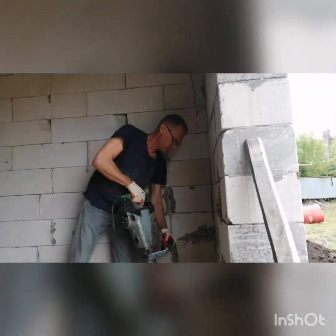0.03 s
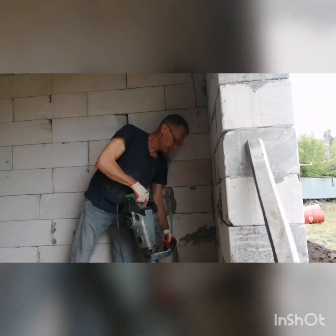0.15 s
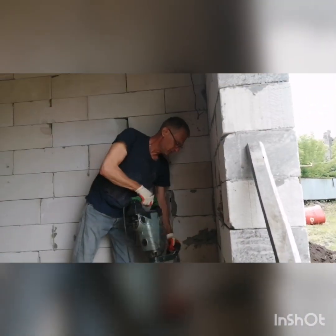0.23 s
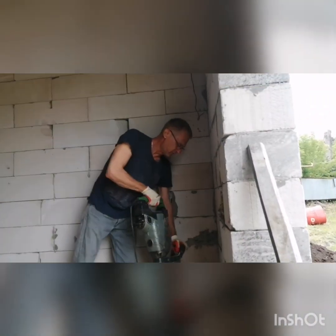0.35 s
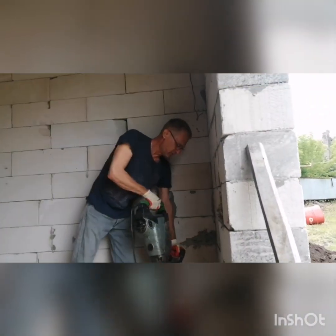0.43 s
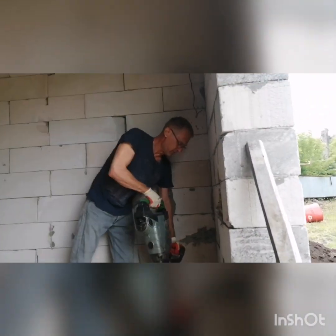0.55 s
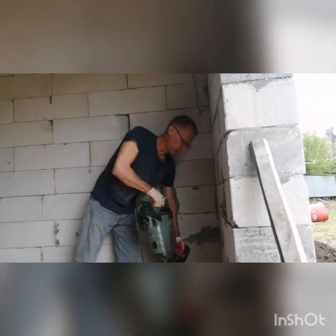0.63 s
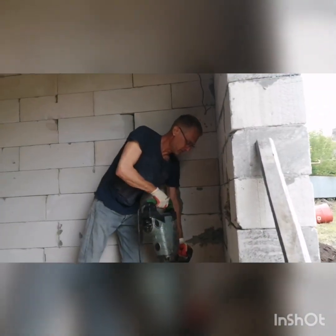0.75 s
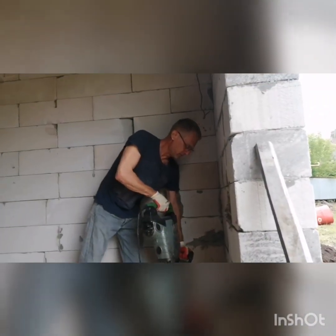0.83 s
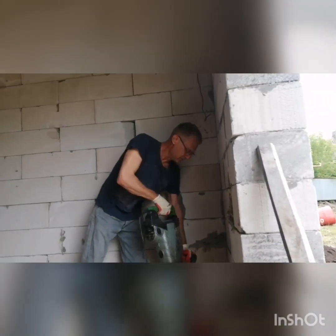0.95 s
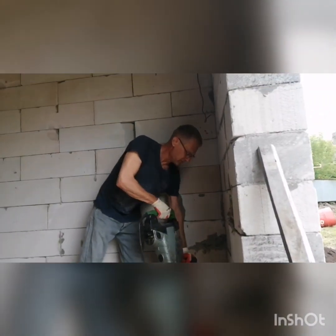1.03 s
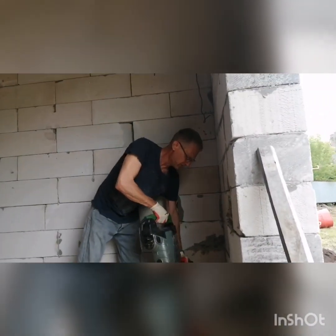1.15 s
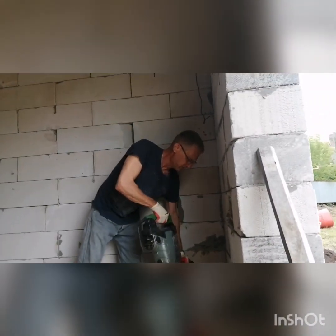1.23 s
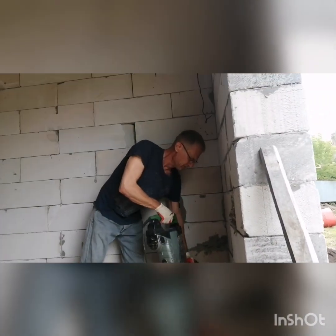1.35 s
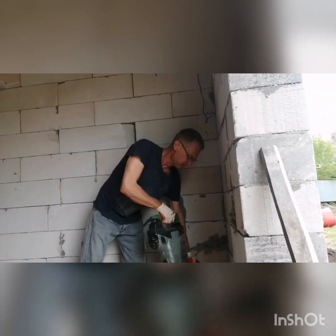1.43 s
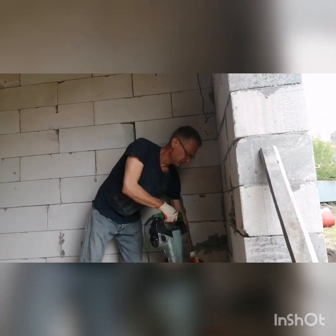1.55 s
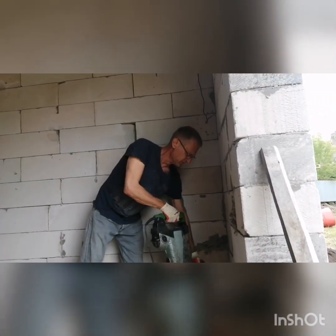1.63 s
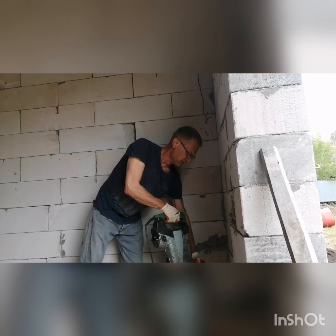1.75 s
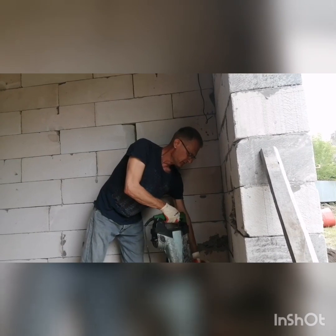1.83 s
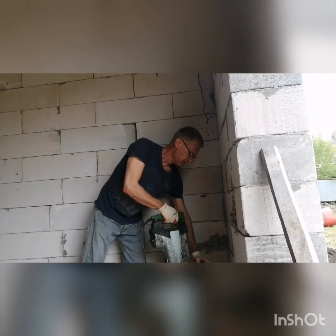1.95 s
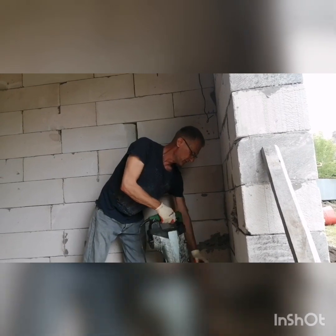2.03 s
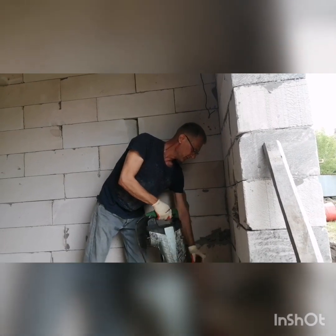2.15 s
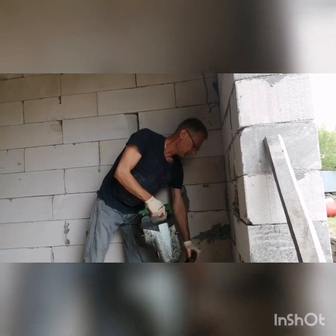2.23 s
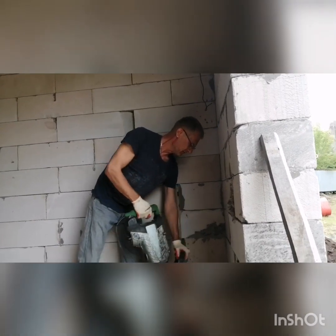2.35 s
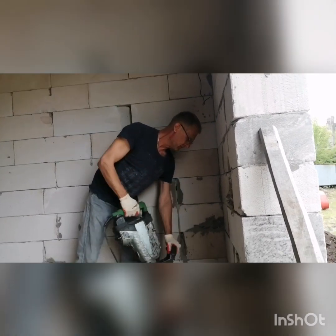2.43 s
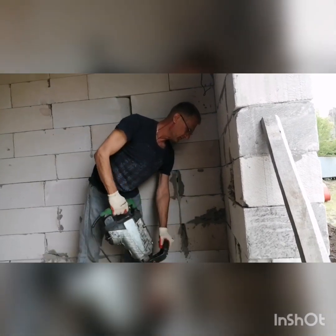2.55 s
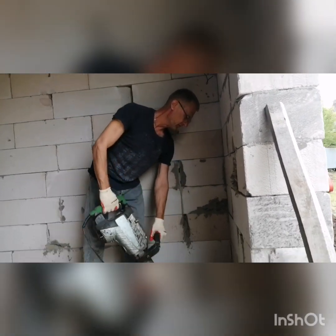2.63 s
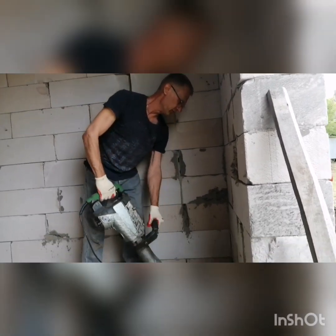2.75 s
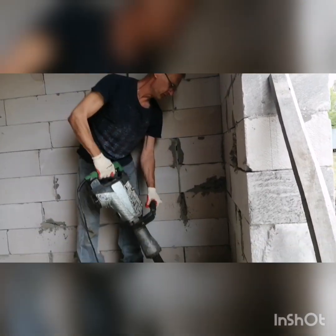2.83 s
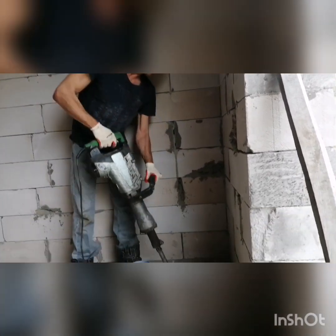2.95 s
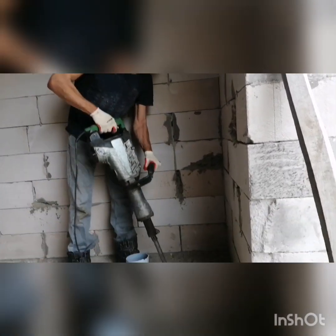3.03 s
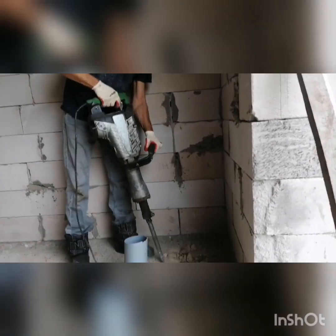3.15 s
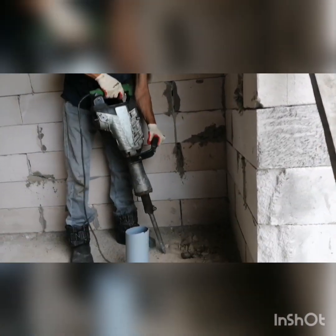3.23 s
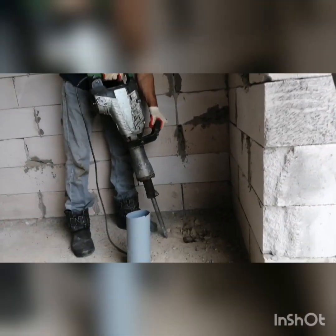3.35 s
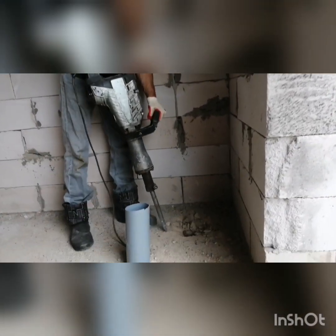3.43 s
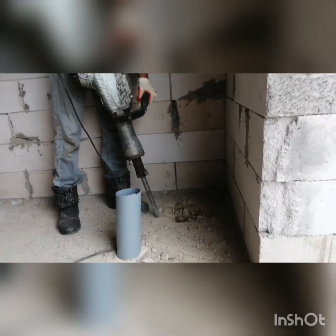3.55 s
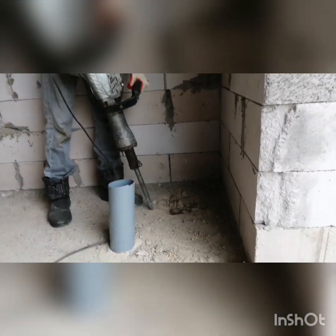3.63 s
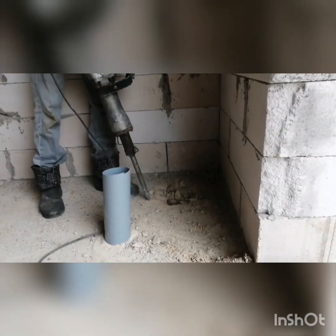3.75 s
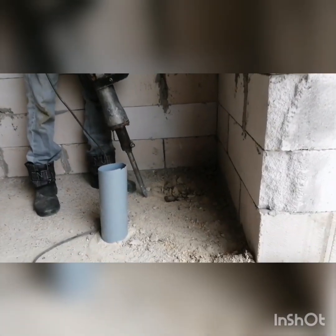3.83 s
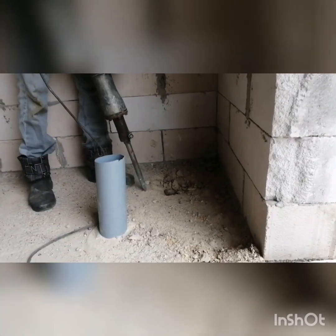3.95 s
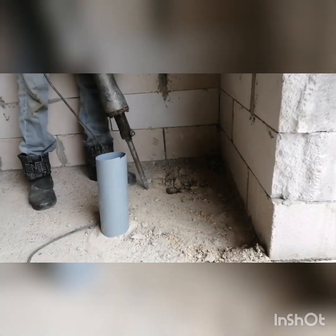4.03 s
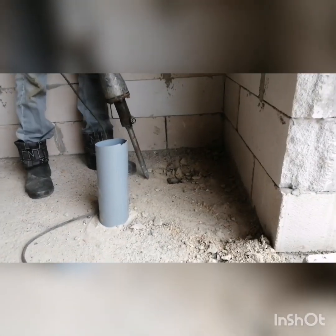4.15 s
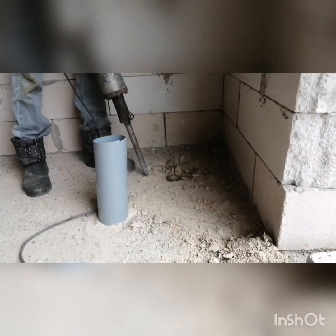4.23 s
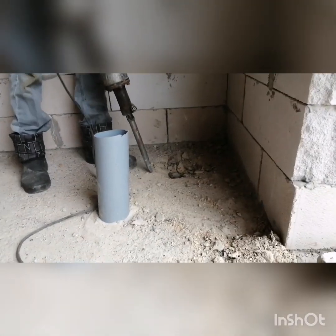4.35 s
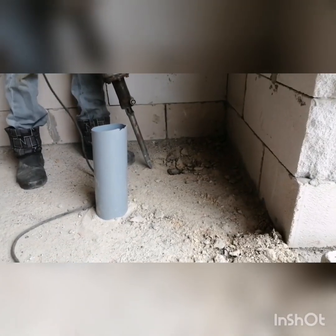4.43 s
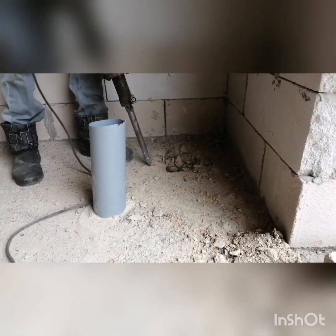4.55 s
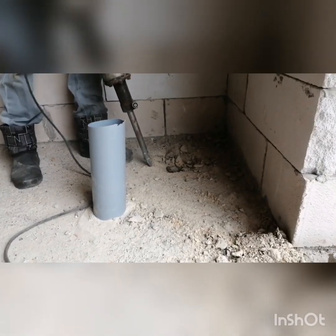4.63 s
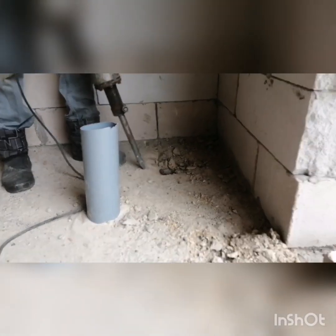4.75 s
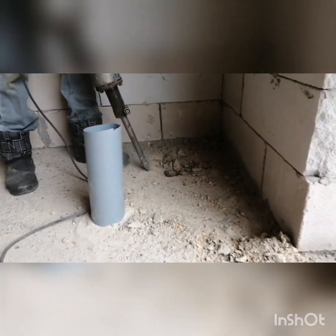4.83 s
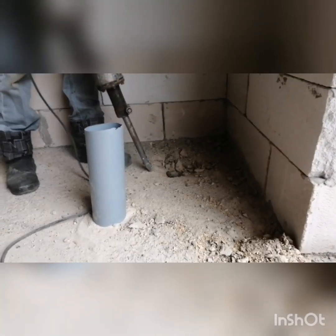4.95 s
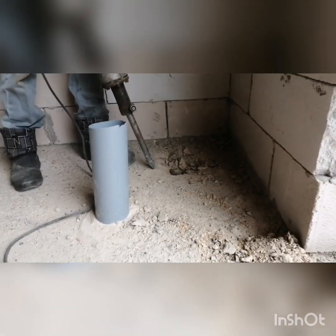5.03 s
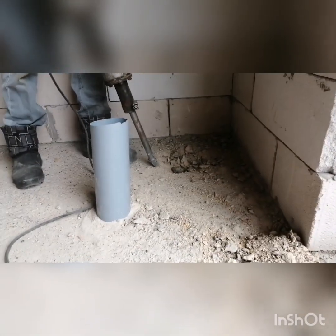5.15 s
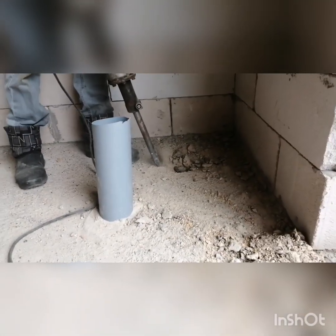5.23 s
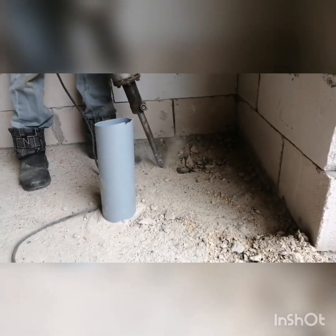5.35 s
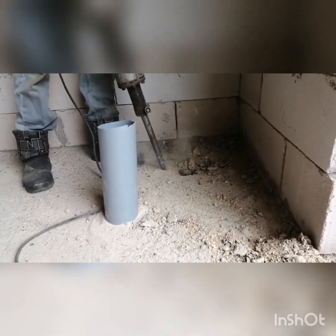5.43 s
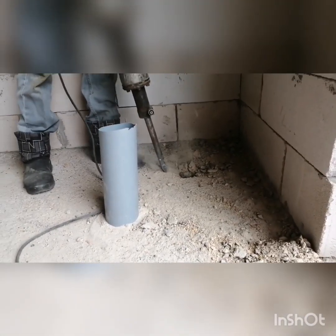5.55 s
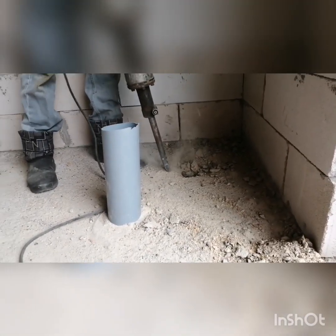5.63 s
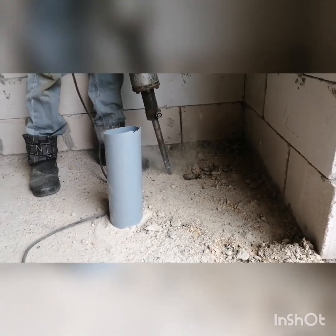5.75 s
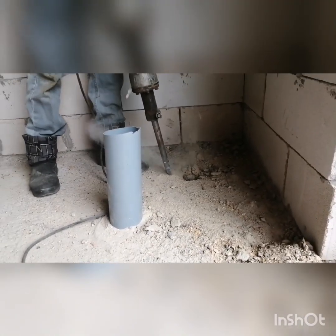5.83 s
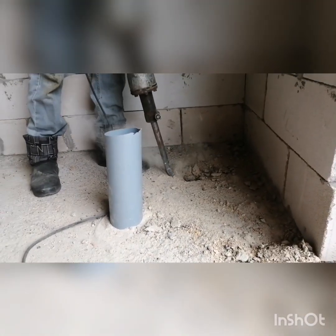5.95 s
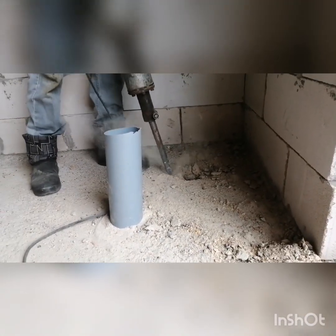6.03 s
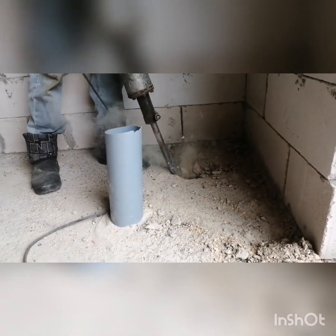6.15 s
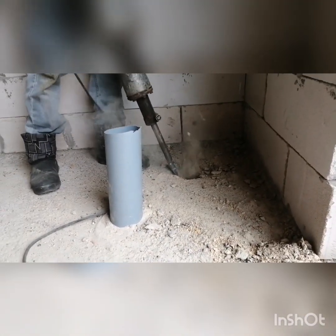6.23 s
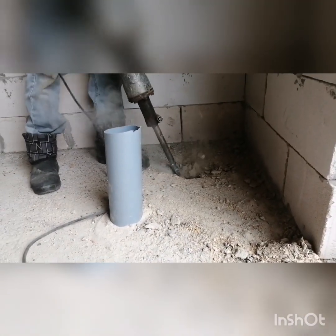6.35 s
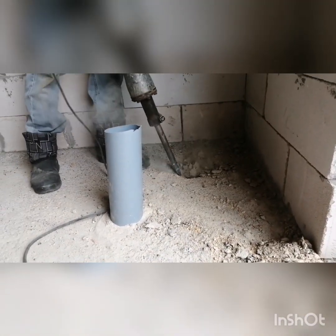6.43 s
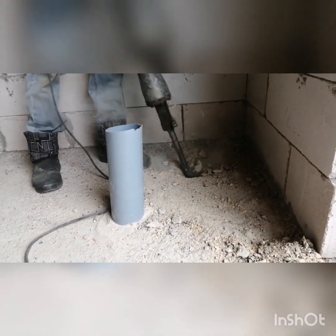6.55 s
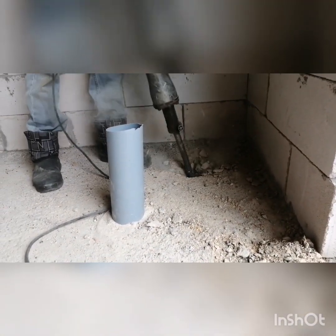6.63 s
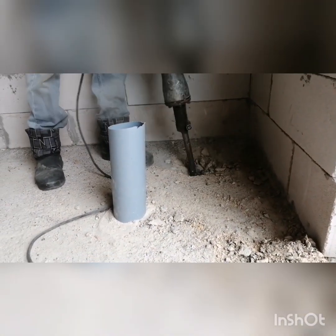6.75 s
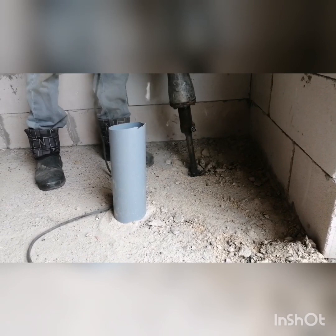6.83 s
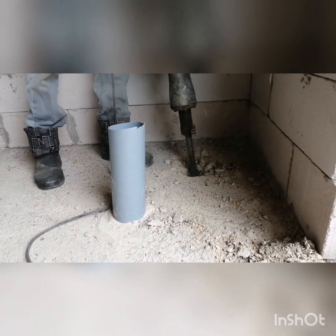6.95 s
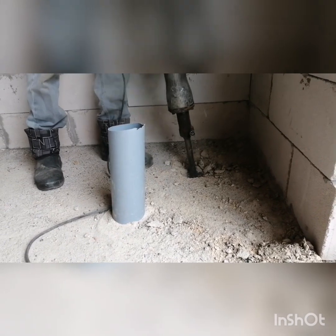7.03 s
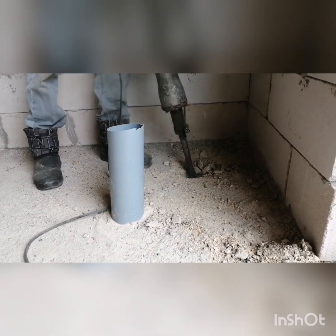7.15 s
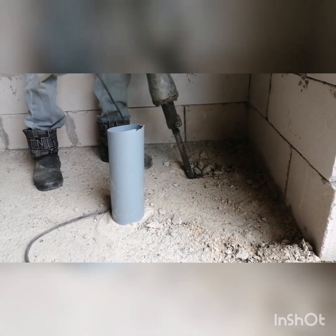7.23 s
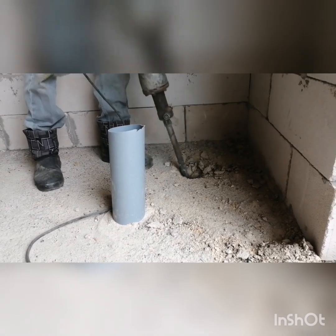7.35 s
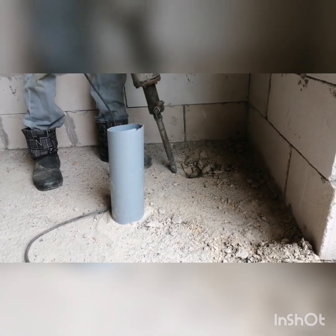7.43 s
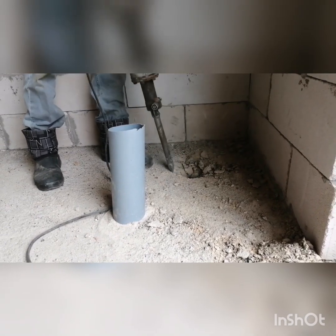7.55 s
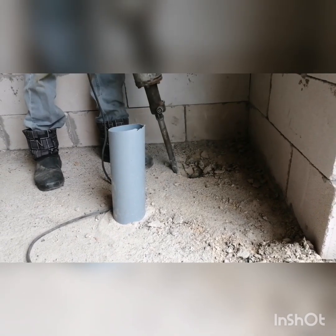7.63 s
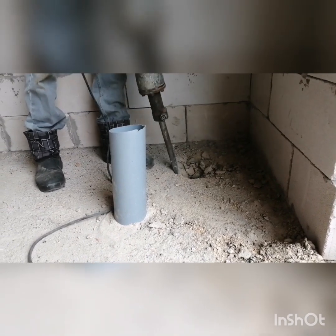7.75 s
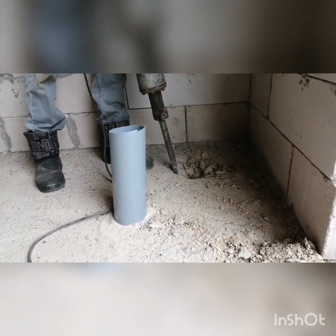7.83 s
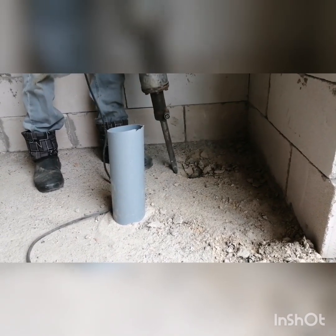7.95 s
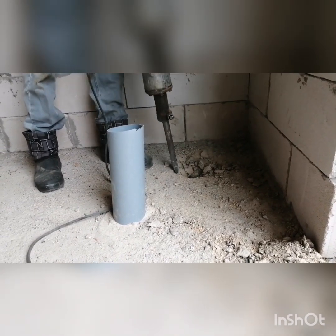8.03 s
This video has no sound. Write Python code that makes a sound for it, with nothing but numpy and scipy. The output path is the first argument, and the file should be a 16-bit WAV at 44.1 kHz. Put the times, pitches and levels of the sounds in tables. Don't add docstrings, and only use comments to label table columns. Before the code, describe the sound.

Geared motor noise and a brief squeak lead into a dry, rattling run of steel blows on concrete, slowing unevenly until it stops. A quieter pause holds ringing chisel clinks, dull bumps and small stones turning. Then the breaker restarts harder, with low floor rumble and gritty noise, before the slab gives way and the strokes slow. Soft boot thuds and metal clanks end it. Hard walls give short, diffuse reverberation; the microphone is near and buffeted.

```python
import sys
import numpy as np
from scipy import signal
from scipy.fft import rfft, irfft, next_fast_len
from scipy.io import wavfile

SR = 44100
rng = np.random.default_rng(int(sys.argv[2]) if len(sys.argv) > 2 else 0)


def boost(x):
    u = np.asarray(x, float) / 20
    return 10 ** u


def unload_wav(signal):
    wavfile.write(
        sys.argv[1],
        SR,
        np.round(np.clip(np.atleast_2d(signal).T, -1, 1) * 32767).astype(np.int16),
    )


N = 356769

# (frequency [Hz], level [dB], t60 [s])
CHISEL_MODES = [(6675, -3.5, 0.13), (6790, -8, 0.08), (6720, -10, 0.1), (6875, -8, 0.093), (6960, -14, .05),
                (9610, -11, .08), (12020, -27.5, 0.12), (12950, -18, .04), (14150, -22, .06)]
# (frequency [Hz], level [dB], t60 [s])
BENDING_MODES = [(2330, -6, .05), (2480, -8, .05), (4330, -3, .04), (4480, -1, .06), (4620, -6, .04)]
# (frequency [Hz], density [dB per Hz])
DULL_CRACK = [(300, -11), (1500, -6), (3000, 0.5), (7000, 3), (9500, -6.5), (12000, -16), (16000, -18)]
# (time [s], blow force [dB], seating in the slab [dB])
BITE_FIRST = [
    (0.499, -30.5, -37),
    (.68, -20.5, -22.5),
    (.87, -24, -20),
    (1.001, -28, -28),
    (1.12, -26.5, -48.5),
    (1.4, -27.5, -36),
    (1.65, -30, -37),
    (2.1, -28, -44.5),
    (2.62, -29, -50.5),
]
# (time [s], blow force [dB], seating in the slab [dB])
BITE_SECOND = [
    (5.12, -25, -31),
    (5.36, -16, -25.5),
    (5.6, -20.5, -28),
    (5.9, -15.5, -16.5),
    (6.12, -25, -27),
    (6.18, -21.5, -30),
    (6.5, -22.5, -24),
    (6.63, -19, -51),
    (7.16, -21, -54),
]
# (time [s], rumble [dB], casing drone [dB])
SHIFTS = [
    (.488, -40, -61),
    (3.19, -49, -58),
    (3.32, -41.5, -60),
    (4.29, -50, -76),
    (4.35, -52.5, -62),
    (4.68, -48.5, -48.5),
    (4.8, -57, -88),
    (5.08, -48, -74),
    (7.66, -60, -49.5),
    (7.75, -53, -57),
]


def in_time(rows):
    s, *columns = np.transpose(rows)
    return [np.interp(np.arange(N) / SR, s, c) for c in columns]


def at_hz(points, hz):
    log_hz, values = np.log(np.array(points)[:, 0]), np.array(points)[:, 1]
    return np.interp(np.log(hz + 1), log_hz, values)


def rms_one(x):
    return x / np.sqrt(np.mean(x ** 2) + 1e-20)


def colour(x, spectrum, share=1):
    size = next_fast_len(x.shape[-1])
    gain = boost(share * at_hz(spectrum, np.fft.rfftfreq(size, 1 / SR)))
    return irfft(rfft(x, size) * gain, size)[..., :x.shape[-1]]


def clicks(times, db):
    out = np.full(N, 1e-18)
    index = np.minimum((times * SR).astype(int), N - 1)
    np.add.at(out, index, boost(db))
    return out


def dying(x, t60):
    return signal.lfilter([1], [1, -boost(-60 / (t60 * SR))], x)


def ring(x, hz, t60):
    r, w = boost(-60 / (t60 * SR)), 2 * np.pi * hz / SR
    return signal.lfilter([0, np.sin(w)], [1, -2 * r * np.cos(w), r * r], x)


def grains(spread_db, share):
    share = np.clip(share, 0, 1)
    size_db = spread_db * np.minimum(rng.exponential(1, N), 4)
    own = rng.standard_normal((3, N)) * boost(size_db)
    return share * own[0] + own[1:] * np.sqrt(1 - share ** 2)


def flicker(rate):
    steps = rng.standard_normal(400)
    return np.interp(np.arange(N) / SR * rate, np.arange(len(steps)), steps)


def strokes():
    # (time [s], crack [dB], thump [dB], ring [dB], bending ping [dB])
    first_burst = [(0.5134, -18, -38.5, -22, -31.5), (0.5632, -18, -34.5, -32, -39.5),
                   (0.6091, -18, -31.5, -25.5, -35.5), (0.6594, -17, -28, -28.5, -36.5),
                   (0.7062, -16.5, -33, -30, -36.5), (0.7545, -15, -31, -24.5, -37.5),
                   (0.8003, -15.5, -28.5, -35, -27.5), (0.8473, -20.5, -29.5, -28.5, -37.5),
                   (0.8973, -20, -31.5, -32.5, -45), (0.9476, -23, -33.5, -23, -46.5),
                   (0.9966, -23, -32, -27.5, -40), (1.0437, -20, -33.5, -28.5, -39),
                   (1.092, -21, -39, -29.5, -43), (1.1402, -17, -52, -31, -42),
                   (1.1812, -20.5, -43, -33, -34.5), (1.2258, -21, -41, -32, -37),
                   (1.271, -16.5, -44, -33.5, -33), (1.317, -21, -48.5, -33, -58),
                   (1.3669, -21, -40, -32.5, -46), (1.4167, -17.5, -38.5, -35, -38),
                   (1.4655, -23.5, -41, -28, -36), (1.513, -19, -45.5, -35.5, -31),
                   (1.5572, -21.5, -44.5, -28.5, -40), (1.6058, -18.5, -49, -33, -34),
                   (1.662, -23, -47.5, -28.5, -44), (1.7043, -17.5, -41, -32, -40),
                   (1.7587, -18.5, -43, -28.5, -32), (1.8065, -19, -47.5, -28, -42),
                   (1.8547, -22, -42, -28.5, -38), (1.8986, -20, -48, -28.5, -44),
                   (1.948, -20.5, -48.5, -30, -33), (2.0071, -24, -46, -27, -43),
                   (2.0774, -25.5, -59, -29.5, -32), (2.1451, -23.5, -52, -30, -46),
                   (2.2284, -21.5, -43.5, -32.5, -56), (2.3262, -22.5, -41.5, -36, -42),
                   (2.4506, -22, -38.5, -34, -26), (2.6151, -23, -49, -37.5, -35)]
    # (time [s], crack [dB], thump [dB], ring [dB], bending ping [dB])
    second_burst = [(5.1259, -19, -28, -30, -32), (5.1965, -14, -26.5, -30, -42),
                    (5.257, -17, -26, -26, -38), (5.3104, -14.5, -27.5, -33, -31),
                    (5.3641, -14, -29.5, -28.5, -36), (5.4137, -15.5, -26.5, -36, -40),
                    (5.462, -15, -25, -31.5, -38), (5.5088, -15, -24.5, -34, -43),
                    (5.5559, -15.5, -27, -32, -40), (5.6045, -16, -24, -37, -42),
                    (5.6504, -17, -23.5, -36, -39), (5.6974, -15.5, -27.5, -34.5, -36),
                    (5.7455, -14, -24.5, -37, -28), (5.7917, -15.5, -23.5, -31.5, -36),
                    (5.8365, -16, -23.5, -32, -41), (5.883, -14.5, -25, -28.5, -29),
                    (5.9303, -15.5, -24.5, -32, -30), (5.977, -15, -24, -29, -31),
                    (6.0242, -13, -23.5, -29, -40), (6.0727, -17.5, -23.5, -37, -49),
                    (6.119, -16.5, -24, -34, -43), (6.1679, -16.5, -31, -31.5, -38),
                    (6.2153, -16.5, -33, -37.5, -28.5), (6.26, -14.5, -31, -39, -45),
                    (6.3052, -14, -28.5, -33, -30), (6.351, -17, -29.5, -30.5, -47),
                    (6.3938, -16.5, -29.5, -33, -46), (6.4387, -15.5, -30, -35, -41),
                    (6.4835, -16, -28, -31.5, -41), (6.5259, -12, -30.5, -33, -41),
                    (6.5721, -14, -36, -27, -40), (6.619, -19, -51, -31.5, -37),
                    (6.6584, -20, -38, -35, -44), (6.7021, -17.5, -45, -27.5, -44),
                    (6.7461, -17.5, -38.5, -36, -43), (6.79, -17, -41, -37, -39),
                    (6.8314, -16.5, -47, -29, -42), (6.8794, -15.5, -38.5, -26, -32),
                    (6.9336, -19, -42.5, -36, -34), (6.9935, -18, -36, -28, -29),
                    (7.0646, -19.5, -42, -26, -36.5), (7.1536, -17.5, -39.5, -23, -31)]
    return np.transpose(first_burst + second_burst)


def thump(s, db):
    t = np.arange(-60, 61) / SR / 0.00025
    pulse = (t * t - 1) * np.exp(-t * t / 2)
    push = np.convolve(clicks(s, db), pulse, "same")
    boom = boost(-25.5) * ring(push, hz=408, t60=0.0047) + boost(-36.5) * ring(push, hz=1160, t60=0.0066)
    return boost(6.5) * (push + boom)


def crack(s, db, spectrum, rise):
    late_s = rng.uniform(0.013, 0.026, len(s))
    hit = dying(clicks(s, db), t60=0.027) + dying(clicks(s + late_s, db - 9.5), t60=0.0063)
    swell = signal.lfilter([rise], [1, rise - 1], hit)
    return boost(5.0) * swell * rms_one(colour(grains(2.2, 0.19), spectrum))


def chisel(s, db, modes, rattle_s, trim_db, damping):
    scatter_db = 2.5
    out, noise = np.zeros((2, N)), rng.standard_normal((3, N))
    shake = 0.36 * noise[0] + noise[1:]
    for k, (hz, mode_db, t60) in enumerate(modes):
        struck = clicks(s, db + mode_db + trim_db + scatter_db * rng.standard_normal(len(s)))
        rattle = dying(struck, rattle_s) + 2.46 * dying(struck, t60=0.02)
        fresh_shake = np.roll(shake, 5000 * k, axis=1)
        out += ring(rattle * fresh_shake, hz, t60 / damping)
    return out


def blows():
    # (frequency [Hz], density [dB per Hz])
    sharp_crack = [(300, -9.5), (1500, -7.5), (2600, -5), (3830, -1), (4500, 2), (7000, 0.5), (9000, -4.5),
                   (11000, -4), (13500, 1.5), (15000, -4), (16300, -27.5)]
    # (frequency [Hz], level [dB], t60 [s])
    barrel_modes = [(2150, -3, .012), (2400, -1, .012), (2650, -2, .012), (2900, 0, .012), (3200, -5, .01),
                    (4400, -11, .02)]
    # (time [s], crack [dB], thump [dB], ring [dB], clank [dB])
    extra_contacts = [
        (.489, -29.5, -33, -42, -20),
        (4.6803, -34, -32, -45, -36),
        (.5135, -40, -50, -23, -20),
    ]
    drive_db = [-6, 9, 5, 17]
    drive_slope = [1, 1.179, 0.97, 1.31]
    clank_above_db = [3.5, -7]

    s, *levels = strokes()
    crack_db, thump_db, ring_db, ping_db = [d + k * db for d, k, db in zip(drive_db, drive_slope, levels)]
    burst = (s > 5).astype(int)
    uneven_db = 2.0 * rng.standard_normal(len(s))
    clank_db = thump_db + np.array(clank_above_db)[burst] + uneven_db
    ping = chisel(s, ping_db, BENDING_MODES[2:], rattle_s=.025, trim_db=-30, damping=2)

    beat = np.c_[s, crack_db, thump_db, ring_db, clank_db]
    s, crack_db, thump_db, ring_db, clank_db = np.transpose(np.r_[extra_contacts, beat])
    steel = chisel(s, ring_db, CHISEL_MODES, rattle_s=0.14, trim_db=-27.5, damping=2)
    barrel = chisel(s, clank_db, barrel_modes, rattle_s=.025, trim_db=-27, damping=1)

    gap_s = np.diff(s, prepend=s[0])
    slow = (gap_s > .11) & (gap_s < 1)
    snap = crack(s[~slow], crack_db[~slow], sharp_crack, rise=0.013)
    snap = snap + crack(s[slow], crack_db[slow], DULL_CRACK, rise=0.005)
    return thump(s, thump_db) + snap + steel + barrel + ping


def knocks():
    # (time [s], crack [dB], ring [dB], bending [dB])
    rattles = [(2.793, -76, -40, -49), (2.847, -34.5, -18.5, -35), (3.235, -72, -25, -43),
               (3.871, -71.5, -61, -53), (4.3517, -74, -53, -40.5), (4.439, -72, -60, -51),
               (4.5438, -45.5, -33.5, -48.5), (4.5574, -48, -56, -58), (7.795, -27, -16.5, -52),
               (7.8135, -38, -31, -42), (8.0811, -62, -46, -60)]
    # (time [s], crack [dB], slab thump [dB], ring [dB])
    bumps = [(3.2074, -40.5, -44.5, -57), (3.2696, -59, -42.5, -27.5), (3.3205, -44, -36, -24.5),
             (3.6085, -50, -56, -64), (3.6499, -41.5, -50.5, -62.5), (3.7286, -43.5, -57, -71),
             (3.9602, -56, -58.5, -67.5), (4.3523, -56, -44.5, -69), (4.3999, -48, -44.5, -53),
             (4.44, -53, -51.5, -51), (4.68, -30, -30, -38), (4.7, -55, -48, -64), (4.808, -67, -47, -71),
             (4.896, -57, -51.5, -98), (5.0475, -34, -53, -39), (7.6787, -43, -55, -19.5),
             (7.706, -33, -40.5, -19.5), (7.754, -32, -41, -51), (8.0646, -29, -34, -20.5),
             (8.0811, -35, -36, -64)]
    # (frequency [Hz], level [dB], t60 [s])
    slab_modes = [(181, -5.5, 0.32), (235, -3, 0.25), (294, -24, 0.12), (495, 5, 0.042), (714, 4.5, 0.013),
                  (1090, 8.5, 0.028)]
    thump_below_db, bend_below_db = -42, -14.5
    loose = [(s, snap, tone + thump_below_db, tone, bend) for s, snap, tone, bend in rattles]
    down = [(s, snap, thud, tone, tone + bend_below_db) for s, snap, thud, tone in bumps]
    s, crack_db, thump_db, ring_db, bend_db = np.transpose(loose + down)
    free = [(hz, db - (k > 4), t60) for k, (hz, db, t60) in enumerate(CHISEL_MODES)]
    steel = chisel(s, ring_db, free, rattle_s=0.066, trim_db=-32, damping=1.17)
    bending = chisel(s, bend_db, BENDING_MODES, rattle_s=.05, trim_db=-29, damping=1)
    boom = chisel(s, thump_db, slab_modes, rattle_s=0.07, trim_db=-37.5, damping=1.2).mean(axis=0)
    contact = boost(-1.5) * thump(s, thump_db) + crack(s, crack_db - 3.0, DULL_CRACK, rise=0.06)
    return contact + steel + bending + boom


def room(x):
    # (frequency [Hz], t60 [s])
    decay_times = [(100, 0.55), (400, 0.52), (1500, 0.14), (5000, 0.39), (15000, 0.26)]
    # (frequency [Hz], common share)
    walls_alike = [(100, 1), (250, .75), (500, .9), (1500, 0.63), (4000, 0.54)]
    size, tail = SR // 2, 0
    t = np.arange(size) / SR
    for low in 50 * 2. ** np.arange(8):
        high = min(2 * low, 19000) if low < 6000 else 19000
        band = signal.butter(2, [low, high], "band", fs=SR, output="sos")
        alike = np.clip(at_hz(walls_alike, 2.3 * low), 0, 1)
        noise = rng.standard_normal((3, size))
        noise = alike * noise[0] + np.sqrt(1 - alike ** 2) * noise[1:]
        tail = tail + signal.sosfilt(band, noise) * boost(-60 * t / at_hz(decay_times, 1.83 * low))
    tail *= np.clip(t / 0.0017, 0, 1)
    tail /= np.sqrt(np.sum(tail ** 2, axis=1, keepdims=True))
    return boost(-4) * signal.fftconvolve(x, tail, axes=1)[:, :N]


def shifts(db):
    keep = np.exp(-1 / (0.005 * SR))
    return signal.lfilter([1 - keep], [1, -keep], dying(clicks(np.transpose(SHIFTS)[0], db), t60=0.83))


def steady():
    # (time [s], whirr [dB])
    motor_levels = [(0.0, -44), (.3, -42.5), (.47, -37.5), (.52, -36), (1.6, -41.5), (2.49, -46),
                    (2.85, -55), (3.17, -55.5), (3.83, -84), (5.045, -72.5), (5.07, -36), (5.12, -29.5),
                    (5.15, -41), (6.85, -40), (7.19, -52), (7.28, -47), (7.63, -40), (7.72, -48)]
    # (middle time [s], level [dB], half length [s])
    sweeps = [
        (0.068, -47.5, 0.11),
        (0.457, -38.5, 0.16),
        (3.335, -53, 0.1),
        (3.663, -55.5, 0.098),
        (4.433, -63, 0.16),
        (7.363, -53, 0.71),
    ]
    still_db = [-71, -77.5, -92.5]
    slab_carries_db = [-28.5, -35]
    t = np.arange(N) / SR
    motor_db, = in_time(motor_levels)
    stopping_db = 11 * np.clip(t - motor_levels[-1][0], 0, None)
    motor = boost(motor_db - stopping_db)
    _, boom_db, hum_db = np.transpose(SHIFTS)
    drone = boost(still_db[0]) + boost(6) * motor ** 1.38 + shifts(hum_db)
    rumble = boost(still_db[1]) + boost(-33.5) * motor
    for bite, carry_db in zip((BITE_FIRST, BITE_SECOND), slab_carries_db):
        seat_db = in_time(bite)[1]
        starts = np.clip((t - bite[0][0]) / 0.024, 0, 1)
        fades = np.clip(1 - (t - bite[-1][0]) / 0.22, 0, 1)
        drone = drone + starts * fades * boost(-19 + seat_db)
        rumble = rumble + starts * fades * boost(carry_db + 0.45 * seat_db)
    swept = sum(boost(db) * np.clip(1 - abs(t - s) / half, 0, 1) ** 2 for s, db, half in sweeps)
    grit = boost(still_db[2]) + boost(-10) * motor + swept
    return motor + shifts(hum_db - 20), drone, rumble, grit, shifts(boom_db)


def gears(db, modes, share, patchy_db):
    teeth, out = grains(1.5, share), 0
    for k, (hz, width, peak_db) in enumerate(modes):
        r = np.exp(-np.pi * width / SR)
        a = [1, -2 * r * np.cos(2 * np.pi * hz / SR), r * r]
        gain = boost(peak_db + patchy_db * flicker(25))
        out = out + (-1) ** k * gain * signal.lfilter([1 - r * r, 0, r * r - 1], a, teeth)
    return boost(db) * rms_one(out)


def coasting():
    # (time [s], frequency [Hz], level [dB])
    run_down = [
        (7.2, 680, -75),
        (7.27, 655, -60),
        (7.4, 598, -57),
        (7.53, 545, -52.5),
        (7.65, 495, -60),
        (7.69, 485, -69),
    ]
    # (multiple of the rotation, level [dB])
    orders = [(1, 0.5), (1.5, -4), (2, -2), (3, -11), (4, -4)]
    t = np.arange(N) / SR
    hz, db = in_time(run_down)
    turns = np.cumsum(hz * (1 + .012 * flicker(60))) / SR
    tones = sum(boost(order_db + 6.5 * flicker(45)) * np.sin(2 * np.pi * k * turns) for k, order_db in orders)
    return boost(db) * tones * (t > run_down[0][0]) * (t < run_down[-1][0])


def motor_noise(whirr, drone):
    # (frequency [Hz], width [Hz], level [dB])
    housing = [(1944, 250, -3), (2275, 100, 5.5), (2537, 100, 2.5), (3140, 710, -4.5), (5300, 430, 2.5)]
    # (frequency [Hz], width [Hz], level [dB])
    casing = [(540, 250, -2.5), (1017, 58, -2), (1120, 110, -0.5), (1300, 330, -10)]
    throbs = [0.022, 0.195, 0.364, 7.215, 7.326, 7.446, 7.586]
    load = .6 + dying(clicks(np.array(throbs), -1.5), t60=.55)
    motor = whirr * gears(0.61, housing, 0.58, patchy_db=4.5)
    motor = motor + drone * gears(0.0, casing, 0.88, patchy_db=3.5)
    return load * (motor + coasting())


def squeaks():
    # (time [s], frequency [Hz], level [dB], length [s])
    tooth_songs = [(0.051, 1340, -43.5, 0.16), (0.07, 892, -48.5, 0.14), (0.246, 1120, -48.5, 0.12),
                   (0.427, 1136, -44, 0.15), (0.456, 2320, -31.5, 0.055), (5.097, 597, -42, 0.089),
                   (7.35, 1242, -50, 0.049), (7.61, 1575, -47, .05), (7.474, 1120, -47, 0.057),
                   (7.484, 2260, -43, 0.069), (7.612, 1108, -41, 0.038), (7.634, 2330, -50, 0.049)]
    t, out = np.arange(N) / SR, 0
    for s, hz, db, length in tooth_songs:
        swell = np.clip(1 - (2 * (t - s) / length) ** 2, 0, 1)
        out = out + boost(db) * swell * rms_one(ring(rng.standard_normal(N), hz, t60=0.08))
    return out


def floor_rumble(shake):
    # (frequency [Hz], density [dB per Hz])
    rumble_spectrum = [(80, -35), (150, -4.5), (200, 7.5), (330, 4.5), (500, -6.5), (1000, -51.5)]
    # (frequency [Hz], width [Hz], level [dB])
    floor_modes = [(190, 38, -3), (247, 31, -0.5), (328, 18, 0), (393, 30, -1.5), (464, 90, -12)]
    low_noise = boost(-8.0) * rms_one(colour(grains(0.41, 0.98), rumble_spectrum))
    return shake * (low_noise + gears(-2.5, floor_modes, 0.85, patchy_db=3.0))


def settling(settle):
    # (frequency [Hz], density [dB per Hz])
    boom_spectrum = [(50, -23), (100, -6), (170, -0.5), (260, -1), (400, -9), (600, -12), (1000, -51.5)]
    return settle * rms_one(colour(grains(0.94, 1.0), boom_spectrum))


def scrape():
    # (time [s], level [dB], t60 [s])
    drags = [
        (4.691, -56, 0.36),
        (4.799, -53, 0.27),
        (4.885, -57, 0.22),
    ]
    # (time [s], level [dB], t60 [s])
    pebbles = [
        (4.786, -41, 0.061),
        (4.806, -40, 0.059),
        (4.824, -51, 0.07),
        (4.849, -56, 0.07),
        (4.884, -54, 0.062),
        (4.899, -54, 0.07),
        (4.937, -59, 0.07),
        (4.981, -52.5, 0.07),
        (5.003, -56, 0.07),
    ]
    rows = drags + [(s, db - 11, t60) for s, db, t60 in pebbles]
    stroke = sum(dying(clicks(np.array([s]), db), t60) for s, db, t60 in rows)
    band = signal.butter(2, [700, 3700], "band", fs=SR, output="sos")
    return stroke * rms_one(signal.sosfilt(band, grains(3.6, 0.4)))


def swept_grit(dust):
    # (frequency [Hz], density [dB per Hz])
    grit_spectrum = [(290, -75), (500, -27), (941, -40), (1350, -7), (1670, -3.5), (3240, -3.5),
                     (3580, -6.5), (6180, -6), (15500, -25)]
    return dust * boost(6.0) * rms_one(colour(grains(5.2, 0.092), grit_spectrum))


def thuds():
    # (time [s], frequency [Hz], level [dB])
    footfalls = [
        (7.246, 130, -43.5),
        (7.662, 280, -42.5),
        (7.752, 162, -31),
        (7.87, 95, -48),
        (7.96, 139, -44),
    ]
    swings = sum(ring(clicks(np.array([s]), db), hz, t60=0.079) for s, hz, db in footfalls)
    return signal.lfilter([.03], [1, -.97], swings)


def jolts():
    # (frequency [Hz], density [dB per Hz])
    shove_spectrum = [(20, -4), (45, -4.5), (110, -3), (200, -9), (400, -44.5)]
    s = strokes()[0]
    at, force_db = np.transpose(BITE_FIRST + BITE_SECOND)[:2]
    db = np.interp(s, at, force_db) - 17.5 + 3.5 * rng.standard_normal(len(s))
    shove = dying(clicks(s, db), t60=0.044) * grains(0, 0.23)
    return colour(shove, shove_spectrum) * boost(22.5)


def draught(db):
    # (frequency [Hz], density [dB per Hz])
    draught_spectrum = [(15, -21), (30, -6.5), (70, -3.5), (130, -7.5), (300, -28.5)]
    return boost(db + 2.8 * flicker(20)) * rms_one(colour(grains(0, 0.3), draught_spectrum))


def scene():
    # (time [s], draught [dB], left minus right [dB])
    handheld = [(0.0, -73, -5.5), (0.47, -71.5, -4.5), (0.5, -55.5, -0.5), (2.41, -68, -8), (3.11, -76, -2),
                (3.33, -75, -5.5), (3.72, -67, -4), (4.0, -67, -5), (4.25, -75, 2), (4.41, -75, -2.5),
                (4.73, -79, -1.5), (5.07, -66, -1), (5.18, -53, -1), (6.96, -47.5, -1.5), (7.46, -72, -1),
                (8.09, -63, -1.5)]
    whirr, drone, shake, dust, settle = steady()
    draught_db, pan_db = in_time(handheld)
    hits = blows() + knocks()
    air = hits + room(hits) + motor_noise(whirr, drone) + squeaks() + swept_grit(dust) + scrape()
    panned = air * boost(0.51 * pan_db * [[1], [-1]])
    return panned + floor_rumble(shake) + settling(settle) + draught(draught_db) + jolts() + thuds()


def top_cut(x):
    return signal.sosfilt(signal.butter(12, 16470, fs=SR, output="sos"), x)


def record(dry):
    # (frequency [Hz], left minus right [dB])
    port_difference = [(60, -1), (95, 0), (150, -1), (240, 2.5), (380, 2), (600, 4), (950, 1), (1500, 0.5),
                       (2380, -6), (3770, -5), (5980, -5.5), (9470, 7.5), (15000, -25.5)]
    # (frequency [Hz], level [dB])
    capsule = [(3300, 0), (3830, -7), (4300, -3), (7300, -1), (8300, -5)]
    left = colour(dry[0], port_difference, share=0.67)
    right = colour(dry[1], port_difference, share=-0.29)
    hiss = boost(-92) * rng.standard_normal((2, N))
    x = colour(np.array([left, right]), capsule) + hiss
    x = signal.sosfilt(signal.cheby2(10, 50, 16500, fs=SR, output="sos"), x)
    return top_cut(x)


dry = scene()
out = record(dry)
unload_wav(out)
```